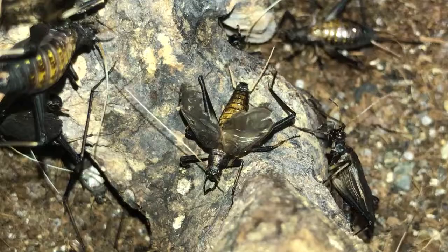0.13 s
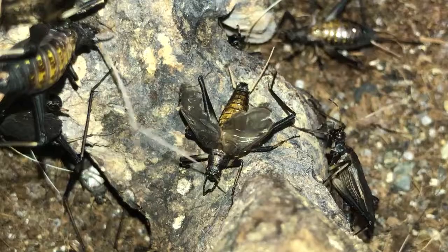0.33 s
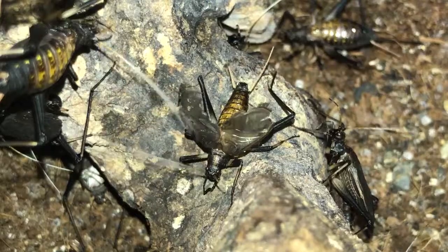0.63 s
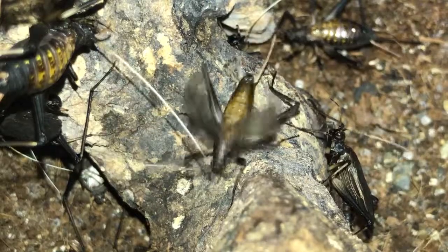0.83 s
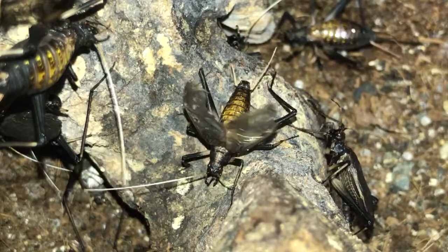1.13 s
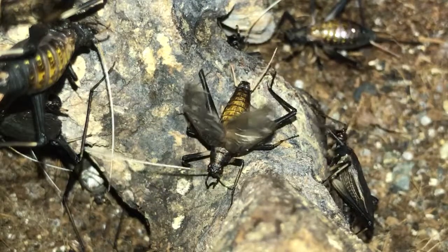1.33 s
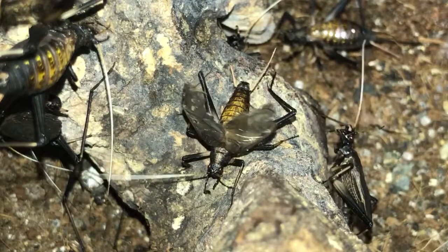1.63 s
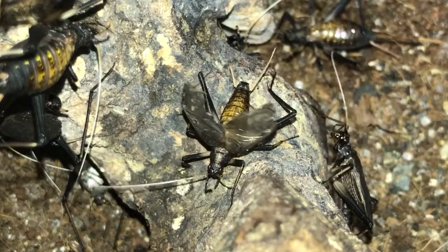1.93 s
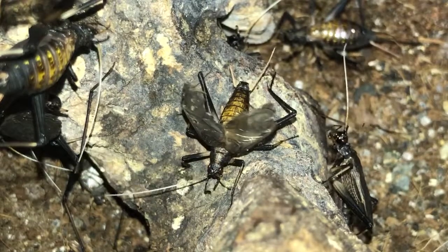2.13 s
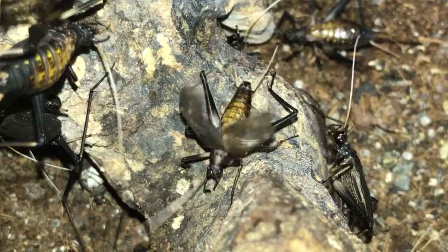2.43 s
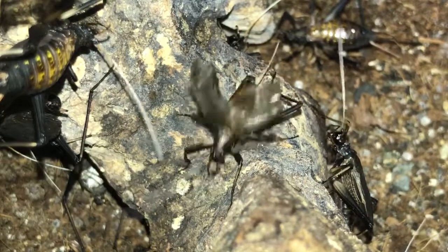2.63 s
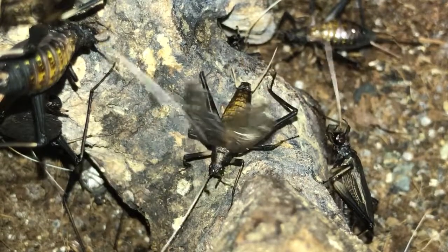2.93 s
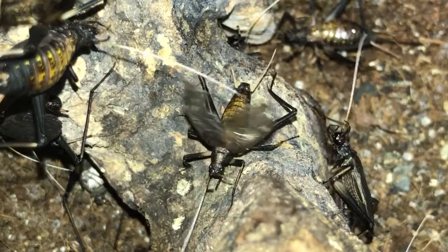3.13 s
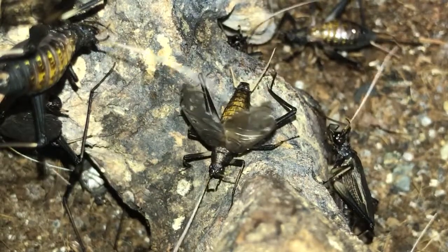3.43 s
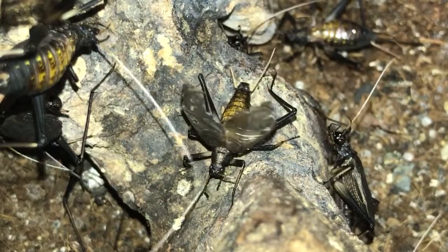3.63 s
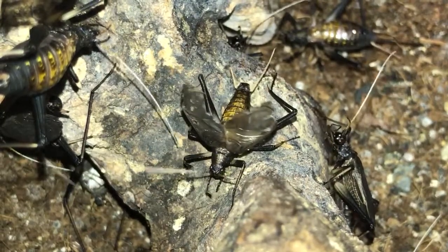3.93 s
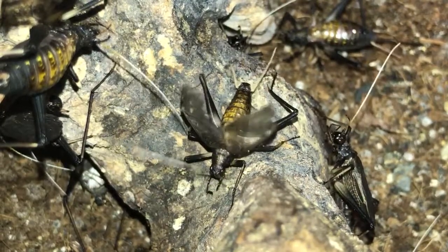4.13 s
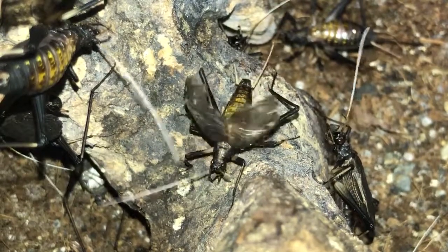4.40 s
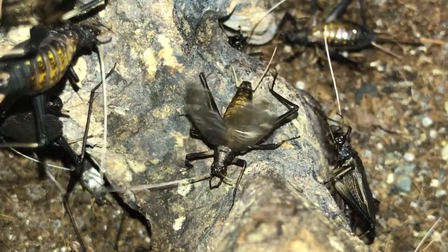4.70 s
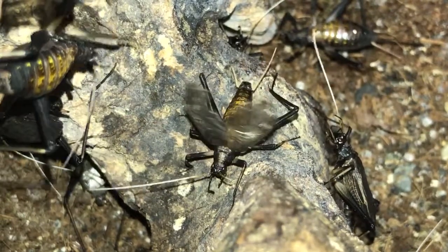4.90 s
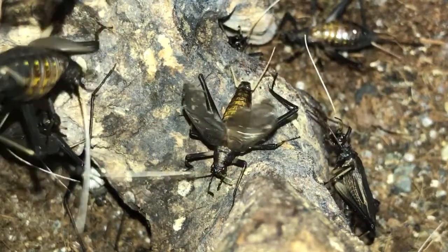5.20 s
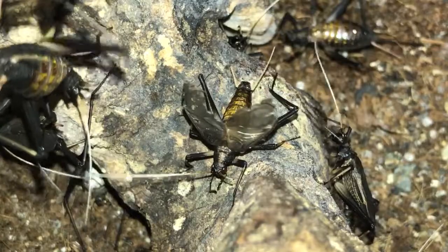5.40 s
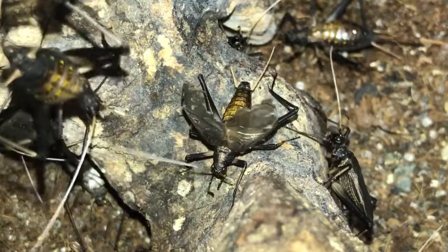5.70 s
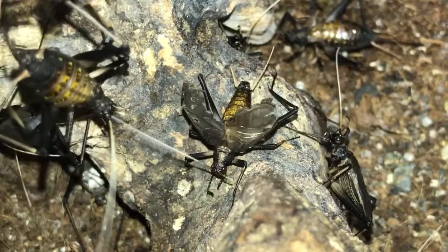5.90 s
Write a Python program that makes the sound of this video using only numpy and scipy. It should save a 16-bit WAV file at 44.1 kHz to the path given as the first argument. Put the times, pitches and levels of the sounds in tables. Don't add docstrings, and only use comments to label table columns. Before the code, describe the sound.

A bell cricket close up rasps softly, then breaks into three loud high ringing trills with buzzing afterglows, over faint room hum.

```python
import sys
import numpy as np
from scipy import signal
from scipy.fft import rfft, irfft, next_fast_len
from scipy.io import wavfile
from scipy.ndimage import uniform_filter1d

SR = 44100
rng = np.random.default_rng(int(sys.argv[2]) if len(sys.argv) > 2 else 0)


def volts_from_db(level):
    exponent = np.asarray(level, float) / 20
    return 10 ** exponent


def master(y):
    cut = np.clip(np.atleast_2d(y).T, -1, 1)
    pcm = np.round(cut * 32767)
    wavfile.write(sys.argv[1], SR, pcm.astype(np.int16))


N = 266981
SIZE = next_fast_len(N)
TIME = np.arange(N) / SR
HZ = np.fft.rfftfreq(SIZE, 1 / SR)


def unit(x):
    return x / np.sqrt(np.mean(x ** 2))


def shape(x, response):
    return irfft(rfft(x, SIZE) * response, SIZE)[..., :N]


def mode(hz, width_hz):
    return 1j * HZ * width_hz / (hz ** 2 - HZ ** 2 + 1j * HZ * width_hz)


def above(hz, order):
    ratio = (HZ / hz) ** order
    return ratio / (1 + ratio)


def causal(gain):
    cepstrum = irfft(np.log(gain), SIZE)
    cepstrum[1:SIZE // 2] *= 2
    cepstrum[SIZE // 2 + 1:] = 0
    return np.exp(rfft(cepstrum))


def walk(rate):
    k = max(int(SR / rate), 2)
    return unit(uniform_filter1d(uniform_filter1d(rng.standard_normal(N), k), k))


# (pitch_hz, level_db per Hz)
AIR_COLOUR = [(21, -47), (35, 5), (355, -6.5), (510, -17), (565, -16), (1950, -17.5), (15300, -29.5),
              (16500, -56)]


def room():
    hz, db = np.transpose(AIR_COLOUR)
    air = shape(rng.standard_normal(N), volts_from_db(np.interp(np.log(HZ + 1), np.log(hz), db)))
    rumble = unit(shape(rng.standard_normal(N), mode(57, 20) ** 2))
    rumble = rumble * volts_from_db(-1.5 - 11.3 * np.clip(TIME - 2.5, 0, 1))
    hum = volts_from_db(-9.5) * unit(shape(rng.standard_normal(N), mode(225, 38.6)))
    since = TIME - 5.08
    groan = np.sin(2 * np.pi * np.cumsum(205 + 200 * since) / SR)
    groan = groan * volts_from_db(2.5 + 2.9 * walk(25)) * np.exp(-(since / 0.098) ** 2)
    return volts_from_db(-66) * (unit(air) + rumble + hum + groan)


def thump():
    swell = np.exp(-((TIME - 4.425) / 0.035) ** 2)
    return volts_from_db(-58.0) * swell * np.sin(2 * np.pi * 80 * TIME)


def tank(x, t60_s, wet_db):
    count = N // 20
    tail = rng.standard_normal(count) * np.exp(-np.log(1000) * TIME[:count] / t60_s)
    return x + volts_from_db(wet_db) * signal.fftconvolve(x, tail / np.linalg.norm(tail))[:N]


# (lull_s, lead_in_s, burst_s, fade_s, afterglow_db)
PHRASES = [
    (1.043, 1.16, 1.245, 1.519, -44),
    (2.575, 2.8, 2.913, 3.39, -44),
    (4.327, 4.423, 4.605, 5.05, -39.5),
]
BURST_REACH_MS = [9.2, 14.2, 12.8]
BEAT_S = [0.1269, 0.9169, 1.318, 1.4698, 1.7407, 2.0638, 2.3145, 2.7452, 3.096, 3.2542, 3.8457, 4.2897,
          4.3658, 4.4429, 4.7478, 4.9108, 5.4356, 5.835]


def effort(s):
    # (stroke_db, reach_ms before the wings close, catch_db, catch_length_ms)
    warm_up, flurry = (-56.5, 6, -56.5, 3.5), (-48, 5.5, -53.5, 3)
    lull, lead_in = (-55, 6.5, -53.5, 2.5), (-39.5, 4, -58, 2.5)
    fade, slack = (-28.5, 14.5, -51, 2.5), (-33, 10, -51, 7)
    step_s, flurry_s = .002, .9
    first_lull_s = PHRASES[0][0]
    knots = [(flurry_s - step_s, *warm_up), (flurry_s, *flurry), (first_lull_s - step_s, *flurry)]
    stops = [phrase[0] for phrase in PHRASES[1:]] + [BEAT_S[-1]]
    for (lull_s, lead_s, burst_s, fade_s, glow_db), reach, stop_s in zip(PHRASES, BURST_REACH_MS, stops):
        knots += [(lull_s, *lull), (lead_s - step_s, *lull), (lead_s, *lead_in)]
        knots += [(burst_s - 0.034, -38, min(11, reach - 2), -57, 2)]
        knots += [(burst_s, -25.5, reach, *fade[2:]), (fade_s, *fade), (fade_s + 0.026, *slack)]
        knots += [(fade_s + .11, glow_db, 9, glow_db - 4.5, 8.5)]
        knots += [(stop_s - step_s, glow_db, 5.96, glow_db - 11, 0.88)]
    knots = np.array(knots).T
    return [np.interp(s, knots[0], column) for column in knots[1:]]


BEAT_COUNT = [0, 31, 47, 53, 64, 77, 87, 104, 117, 123, 146, 163, 166, 169, 180, 186, 206, 221]
# (beat_s, late_ms)
LET_GO = [(1.368, 3.5), (1.393, -3), (1.419, -2.5), (2.934, -6), (2.961, -5), (4.443, 2), (2.799, 1.5),
          (2.988, -2), (3.042, 4), (3.069, -2.5), (3.096, -2), (3.122, 1), (3.175, 3), (3.201, -4),
          (3.254, 3), (3.409, 2), (4.526, -4), (4.554, -2.5), (4.581, -2.5), (4.637, -7), (4.664, -3.5),
          (4.692, 1), (4.72, 1.5), (4.856, -3), (4.911, 3), (4.99, -5), (5.068, -1)]
# (start_s,
# level_db)
MARKED_STROKES = [(0.9137, -43.5), (0.989, -37), (1.858, -39.5), (2.007, -39.5), (2.033, -39.5), (3.4516, -31.5),
                  (3.529, -42), (3.554, -35), (3.5808, -34), (3.658, -36), (3.684, -36), (3.8387, -31.5),
                  (3.868, -34.5), (3.944, -34), (3.9699, -38), (4.022, -33.5), (4.1007, -35.5), (4.127, -38),
                  (4.206, -34.5), (5.082, -32), (5.1104, -31), (5.243, -34.5), (5.375, -37), (5.4825, -33),
                  (5.6151, -33), (5.6721, -33.5), (5.695, -34.5), (5.7486, -32), (5.8006, -37.5), (5.8319, -39),
                  (.6035, -46), (.7085, -48), (1.1627, -46), (1.1855, -46), (1.2118, -35), (2.7955, -38),
           (2.8196, -38), (2.8455, -35), (2.869, -45), (2.8965, -30.5), (4.4405, -40), (4.4648, -35.5),
           (4.4908, -34.5), (4.5705, -31.5), (4.5944, -27.5), (5.137, -32), (5.1645, -33)]
# (start_s, length_ms, level_db)
EXTRA = [
    (1.25, 6.9, -39),
    (2.927, 5.5, -24.5),
    (2.9584, 4.4, -20.5),
    (4.6311, 5.8, -20.5),
    (5.4312, 4.5, -36.5),
    (5.449, 3.9, -52),
    (5.848, 2.2, -50),
    (5.8871, 6.54, -51.5),
    (5.902, 1.9, -55),
]


def strokes():
    release_ms, catch_before_ms, brush_after_ms = 2.5, 15.48, 6
    beat = np.interp(np.arange(BEAT_COUNT[-1] + 1), BEAT_COUNT, BEAT_S)
    db, reach, catch_db, catch_ms = effort(beat)
    chance = rng.standard_normal((len(beat), 8)).clip(-2, 2).T
    weak = np.clip((-29 - db) / 11, .25, 1)
    start = beat - reach * (1 + .13 * weak * chance[0]) / 1000
    end = beat - (release_ms + 0.8 * chance[1]) / 1000
    brush_s = beat + (brush_after_ms + 0.58 * chance[2]) / 1000
    brush_db = np.minimum(db, -42) - 7.5 + 2.55 * chance[3]
    meet = beat - (catch_before_ms - 4.1 / catch_ms + 0.66 * chance[4]) / 1000
    catch_db = catch_db + 1.8 * chance[5]
    catch_ms = catch_ms * (1 + .3 * chance[7])
    db = db + 2.75 * weak * chance[6]
    for s, late_ms in LET_GO:
        k = np.abs(beat - s).argmin()
        end[k] = beat[k] - (release_ms - late_ms) / 1000
    for s, level_db in MARKED_STROKES:
        k = np.searchsorted(beat, s)
        start[k], db[k] = s, level_db
    slow = catch_ms > 2.5
    scrape_ms = np.clip(1000 * (start - meet), 1, catch_ms)
    scrapes = np.transpose([meet, scrape_ms, catch_db])[slow]
    closing = np.transpose([start, np.maximum(1000 * (end - start), 1.5), db])
    rows = np.vstack([closing, scrapes, EXTRA])
    return rows[rows[:, 0].argsort()].T, (meet[~slow], catch_db[~slow]), (brush_s, brush_db)


def pressure(starts, lengths, gains, edge_s):
    on, off = np.zeros((2, N + 1))
    np.add.at(on, np.clip(starts * SR, 0, N).astype(int), gains)
    np.add.at(off, np.clip((starts + lengths) * SR, 0, N).astype(int), gains)
    k = max(int(edge_s * SR), 1)
    held = uniform_filter1d(np.cumsum(on), k) - np.cumsum(off)
    return np.clip(uniform_filter1d(held, k)[:N], 0, 1)


def teeth(rate_hz, jitter, scatter_db):
    chance = rng.standard_normal((N // 8, 2)).T
    gap = np.clip(1 + jitter * chance[0], .1, 3) * SR / rate_hz
    place = np.clip(np.cumsum(gap), 0, N)
    size = volts_from_db(scatter_db * chance[1])
    clicks = np.zeros(N + 2)
    whole = place.astype(int)
    np.add.at(clicks, whole, size * (1 + whole - place))
    np.add.at(clicks, whole + 1, size * (place - whole))
    return clicks[:N]


WING_HZ = [3780, 4300, 4950, 5450, 7000, 8350, 9100, 10600, 11800, 13200, 14500, 15650]
# (width_hz, level_db)
WING = [(324, -8.5), (365, -9.5), (732, -3), (1260, -12.5), (498, -14), (740, -9), (740, -9), (1040, -17),
        (810, -14), (604, -14.5), (930, -13.5), (450, -10)]


def wing():
    power = volts_from_db(2 * -25)
    for hz, (width_hz, db) in zip(WING_HZ, WING):
        power = power + volts_from_db(2 * db) * np.abs(mode(hz, width_hz)) ** 6
    return np.sqrt(power) * above(3330, order=11)


# (multiple, level_db)
RING = [(1, -0.5), (2, -23.5), (3, -19)]


def ring(push):
    ring_hz = 4838
    glide_hz = 14 * uniform_filter1d(14.5 - effort(TIME)[1], SR // 20)
    waver_hz = 28 * walk(200) + 22 * walk(25)
    phase = 2 * np.pi * np.cumsum(ring_hz + glide_hz + waver_hz) / SR
    tones = []
    for k, db in RING:
        tones.append(volts_from_db(db + 1.0 * k * walk(300)) * np.sin(k * phase + .09 * k * walk(1500)))
    drive = np.sqrt(2) * push
    main = shape(drive * tones[0], mode(ring_hz, 610) ** 2)
    return main + drive * np.abs(push / volts_from_db(-34.5)) ** .5 * sum(tones[1:])


def drag(start, hz, length, gain):
    stroke = np.clip(np.searchsorted(start, TIME) - 1, 0, None)
    since = np.clip(TIME - start[stroke], 0, length[stroke])
    phase = 2 * np.pi * np.cumsum(hz[stroke] * (1.02 - 4 * since)) / SR
    octave = volts_from_db(11.5) * np.sin(2 * phase + 0.19 * walk(800))
    return pressure(start, length, gain, .002) * (np.sin(phase) + octave)


# (start_s, tooth_rate_hz, level_db)
SLIP = [(1.384, 1720, -71), (3.002, 1779, -68), (4.598, 1710, -73), (4.871, 1654, -74), (5.057, 1756, -62)]


def cricket():
    (start, ms, db), (catch_s, catch_db), (brush_s, brush_db) = strokes()
    length = ms / 1000
    rasp_db = db - 0.63 * np.logaddexp(0, db + 48.5) * np.clip(ms / 2 - 1, .2, 1)
    ring_gain = np.sqrt(np.clip(volts_from_db(2 * db) - volts_from_db(2 * rasp_db), 0, 1))
    strikes = teeth(4200, jitter=.4, scatter_db=2.5) * volts_from_db(3 * walk(450))
    body = wing()
    scale = volts_from_db(6.0) / np.std(shape(strikes, body))
    catches = pressure(catch_s - .0013, 0.0019, volts_from_db(catch_db + 3.0), 0.00042)
    contact = pressure(start, length, volts_from_db(rasp_db), 0.00041) + catches
    loose_db = rasp_db - 0.73 * np.logaddexp(0, db + 37)
    loose = pressure(start, length, volts_from_db(loose_db), 0.00099) + catches
    light = pressure(brush_s - .0012, 0.0019, volts_from_db(brush_db + 4.0), 0.00049)
    lead_s = .0055
    light = light + volts_from_db(-4.0) * pressure(start - lead_s, lead_s, volts_from_db(rasp_db - 12.0), 0.0006)
    trail_gain = volts_from_db(rasp_db - 10) * np.clip(ms / 8 - .5, 0, 1)
    light = light + pressure(start + length, 0.0056, trail_gain, 0.00092)
    high = above(5650, order=10)
    rasp = shape(strikes * contact, causal(body + volts_from_db(-51)) * high)
    rasp = rasp + shape(strikes * loose, causal(body + volts_from_db(-41)) * (1 - high))
    light_body = body * (above(7800, order=6) + volts_from_db(-21.0)) + volts_from_db(-75.5)
    rasp = rasp + shape(strikes * light, causal(light_body))
    luck = rng.standard_normal((len(ms), 2)).clip(-2, 1.5).T
    drag_hz = 1880 * (1 + .022 * luck[0])
    drag_gain = volts_from_db(db - 20.0 - 3.3 * np.logaddexp(0, db + 38.0)) * np.clip(ms / 2.26 - 2.4, 0, 1)
    slow = drag(start, drag_hz, length, drag_gain * volts_from_db(4 * luck[1] - .8))
    slip_s, slip_hz, slip_db = np.transpose(SLIP)
    slow = slow + drag(slip_s, slip_hz, 0.016 + 0 * slip_s, volts_from_db(slip_db))
    return scale * rasp + ring(pressure(start, length, ring_gain, 0.0022)) + slow


def scene():
    song = tank(cricket(), t60_s=.055, wet_db=-24)
    room_gain = volts_from_db(-2.5 * (TIME > 5.92))
    return (song + thump() + room() * room_gain)[None]


def band_limit(x):
    return signal.sosfilt(signal.butter(12, 16990, fs=SR, output="sos"), x)


TOP_HZ = (15850, 16600)


def record(dry):
    db, _, _, catch_ms = effort(TIME)
    short = catch_ms < 3.5 + 2.5 * walk(40)
    sharp = uniform_filter1d(1. * short * (db > -47) * (db < -33), SR // 50)
    low, high = (shape(dry, 1 - above(hz, order=200)) for hz in TOP_HZ)
    cut = low + sharp * (high - low)
    opening = np.clip((TIME - 0.117) / 0.01, 0, 1) ** 2
    return band_limit(cut * opening)


dry = scene()
out = record(dry)
master(out)
```